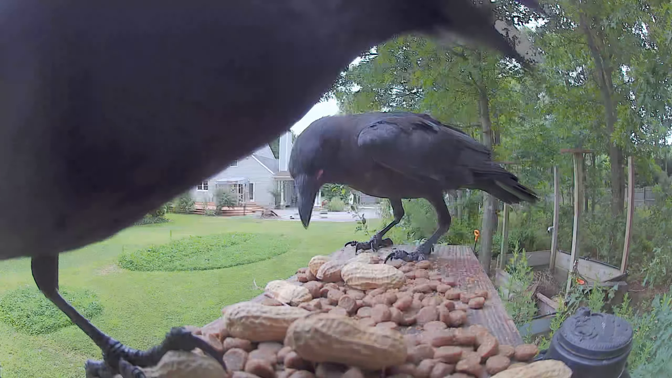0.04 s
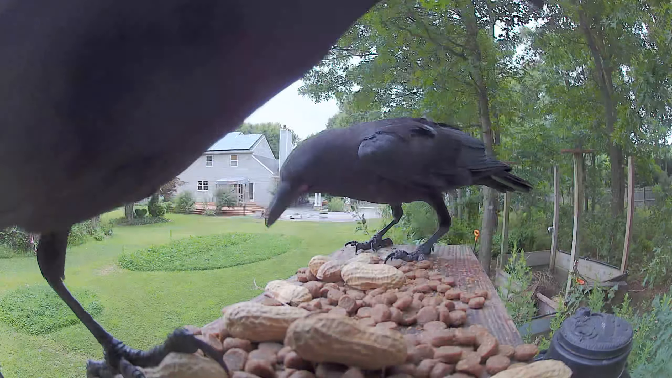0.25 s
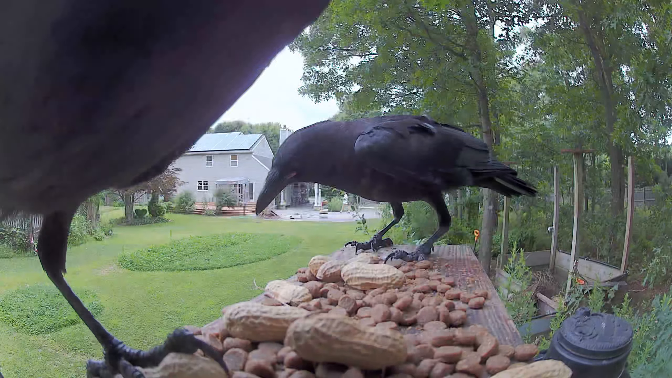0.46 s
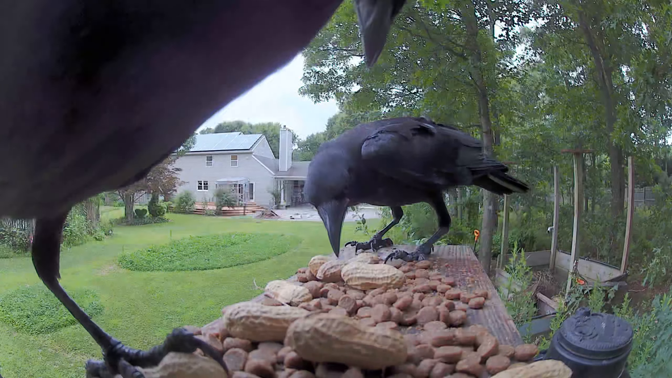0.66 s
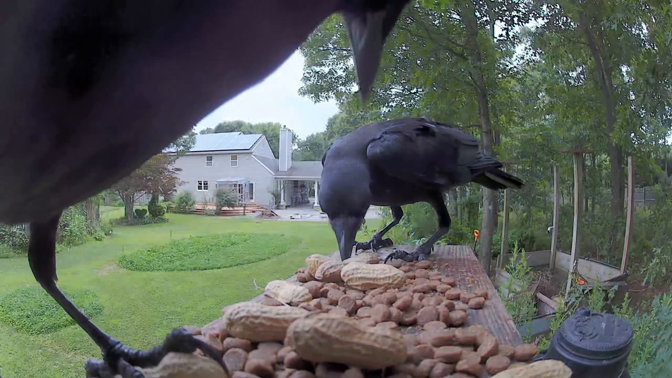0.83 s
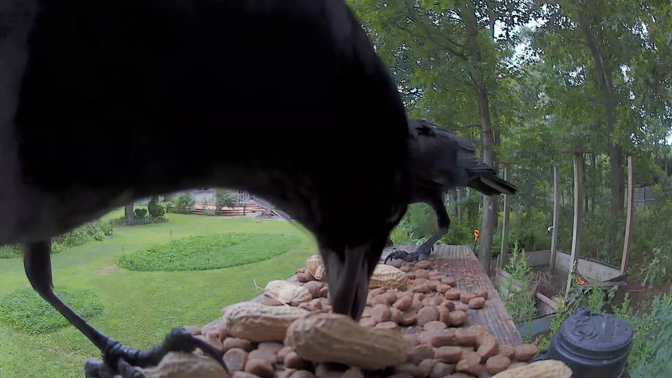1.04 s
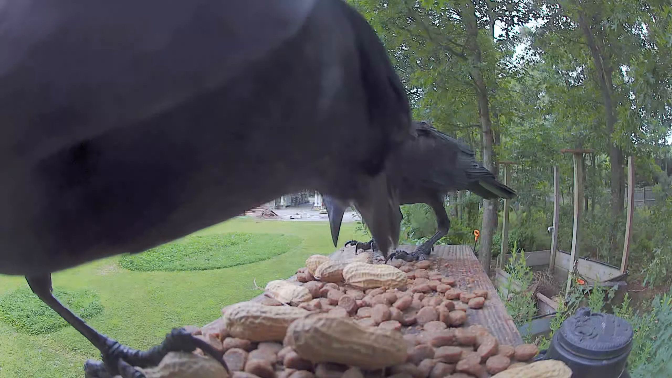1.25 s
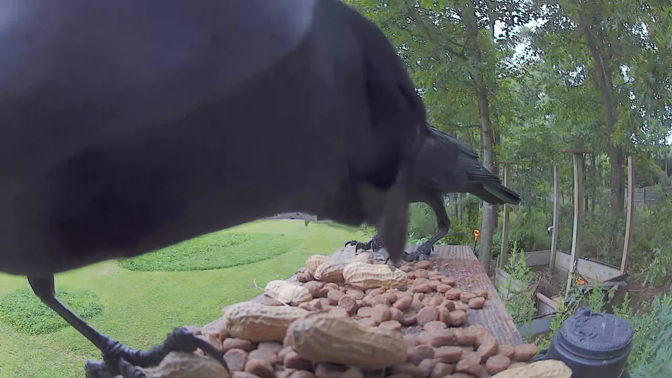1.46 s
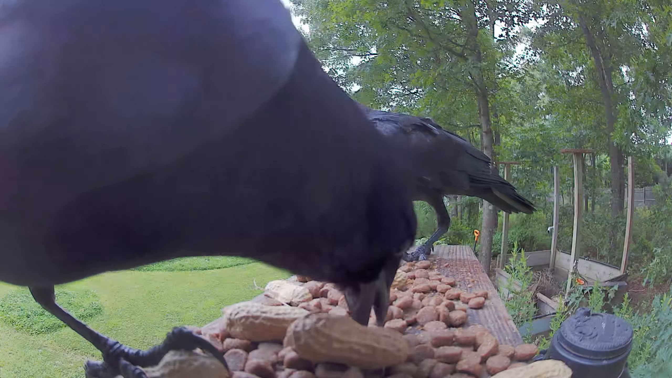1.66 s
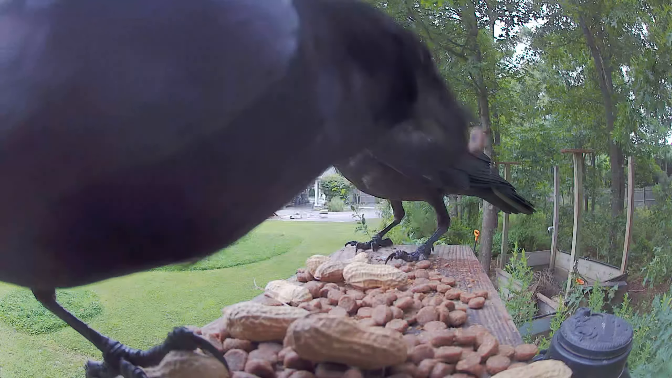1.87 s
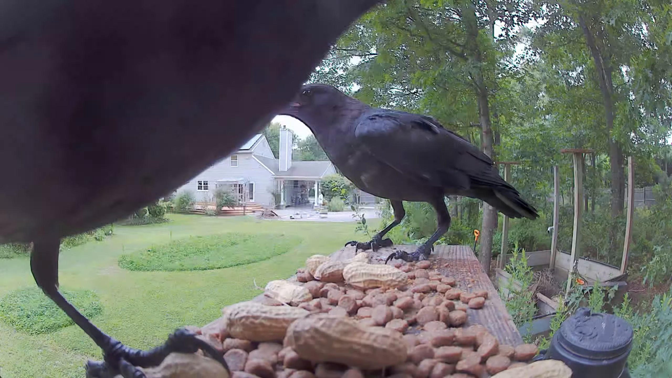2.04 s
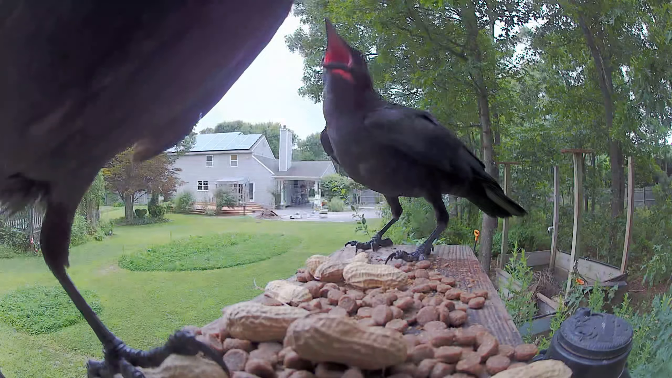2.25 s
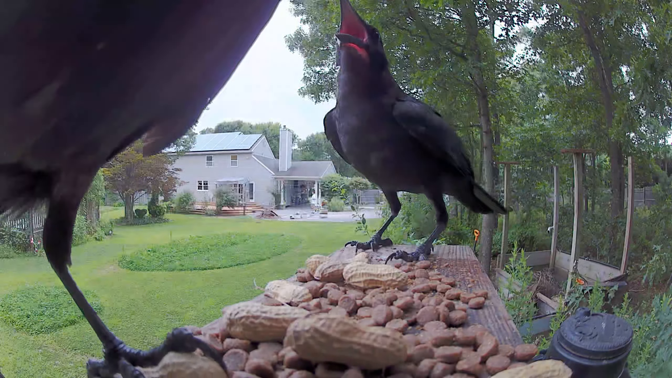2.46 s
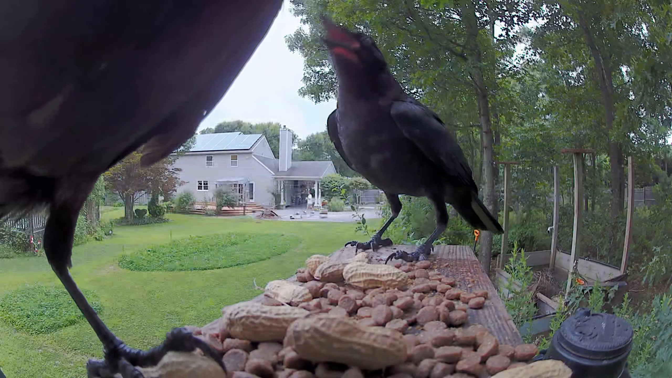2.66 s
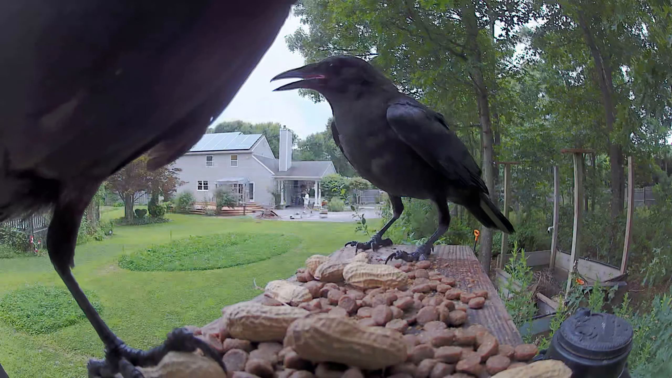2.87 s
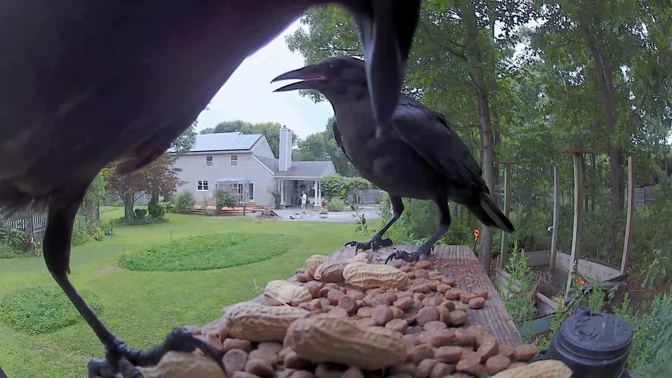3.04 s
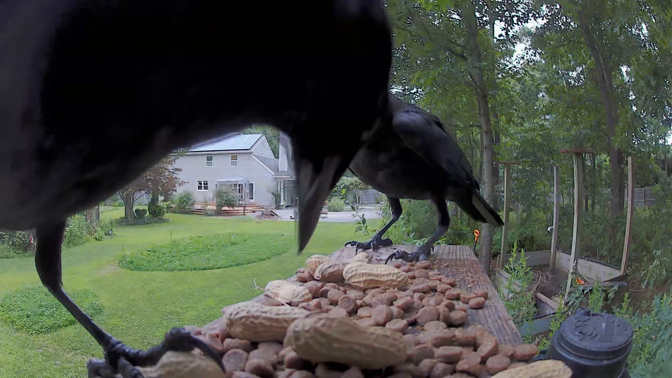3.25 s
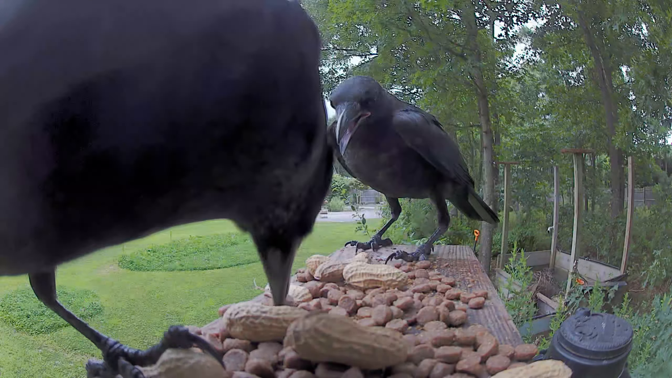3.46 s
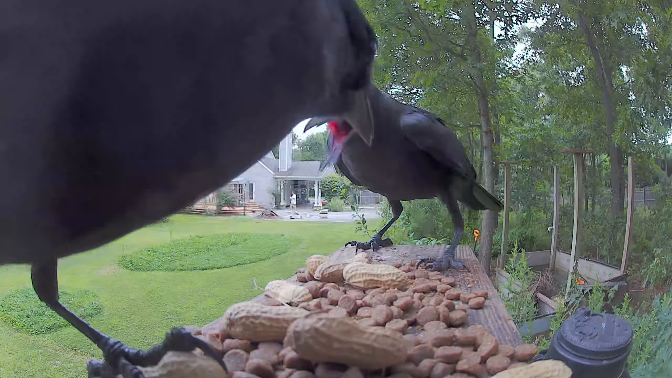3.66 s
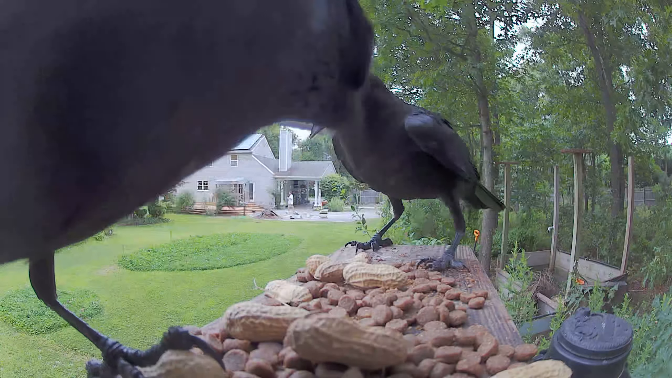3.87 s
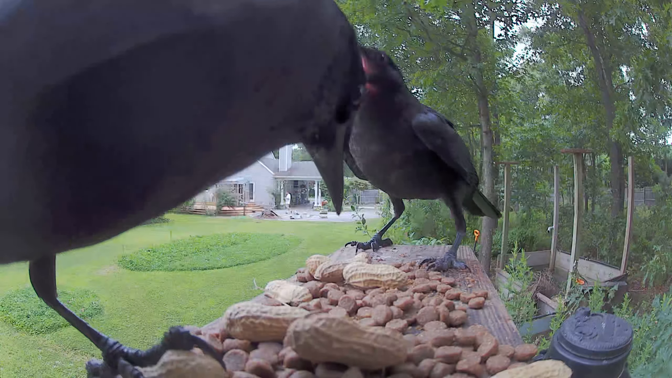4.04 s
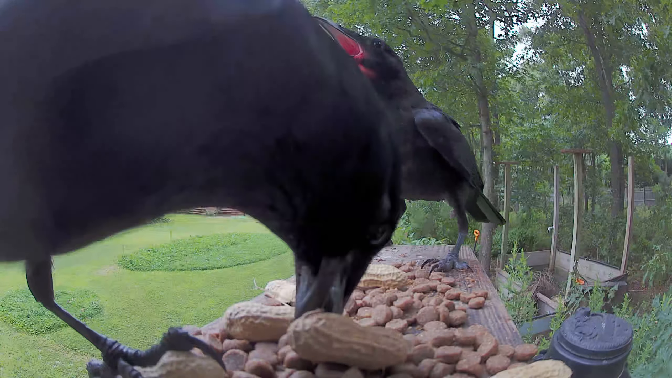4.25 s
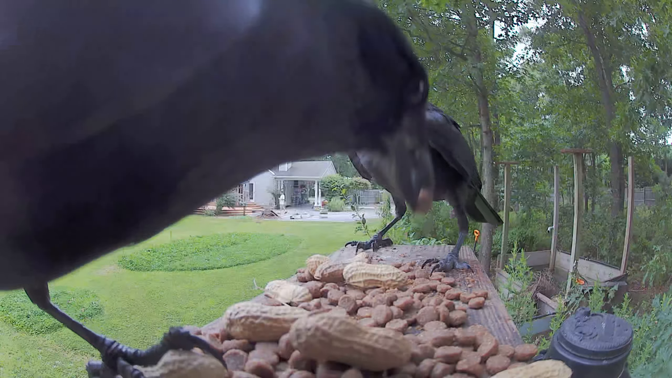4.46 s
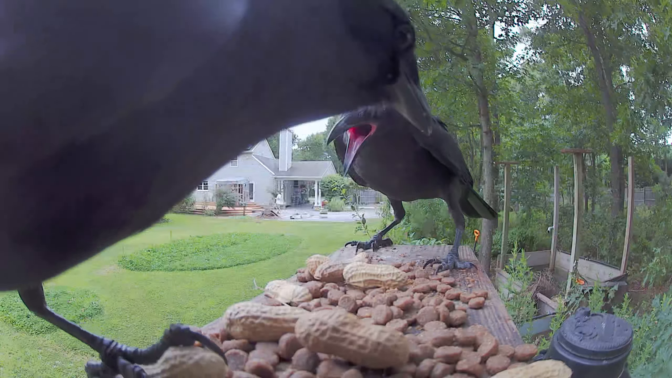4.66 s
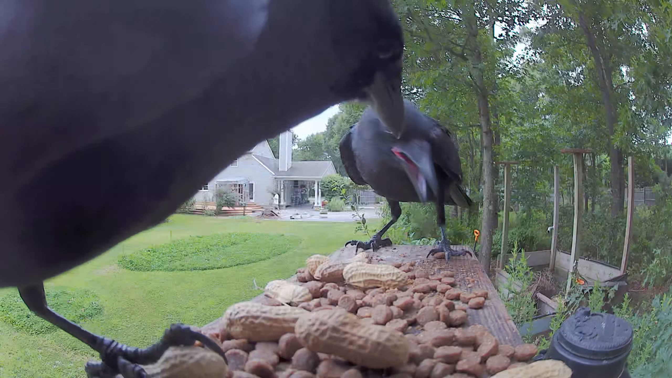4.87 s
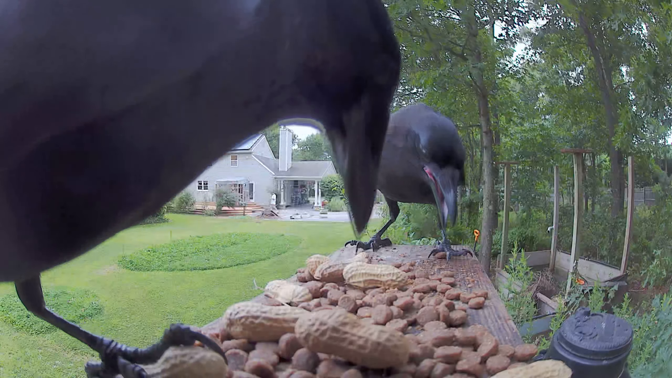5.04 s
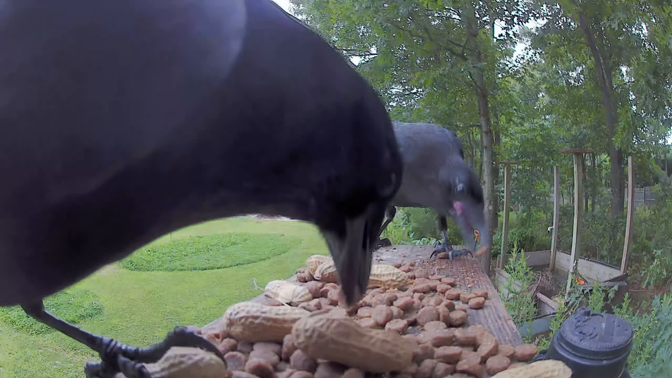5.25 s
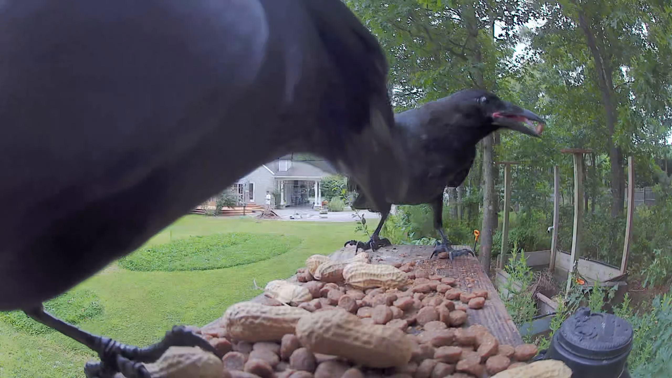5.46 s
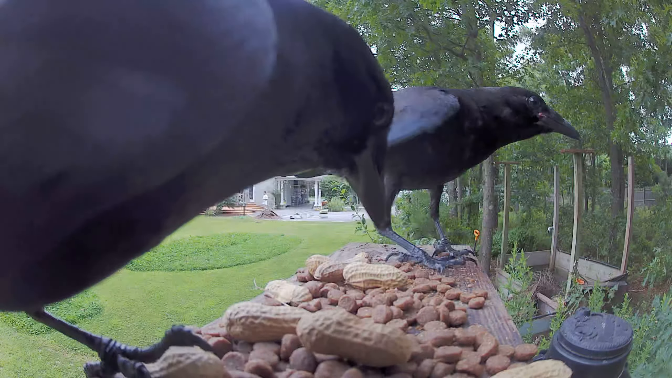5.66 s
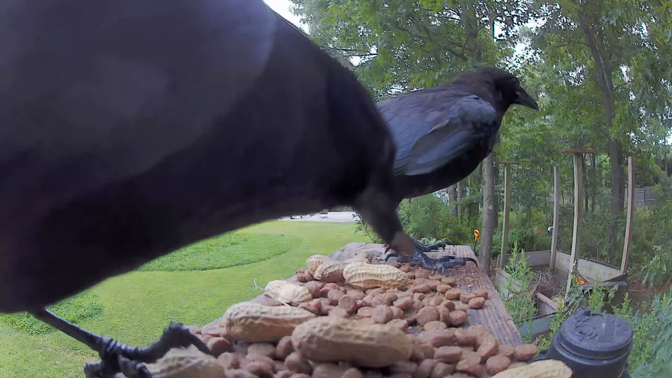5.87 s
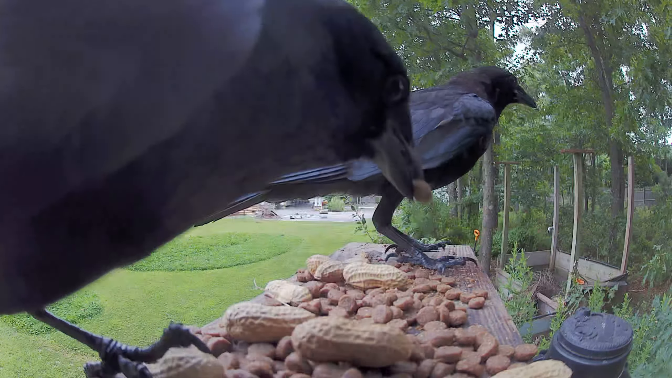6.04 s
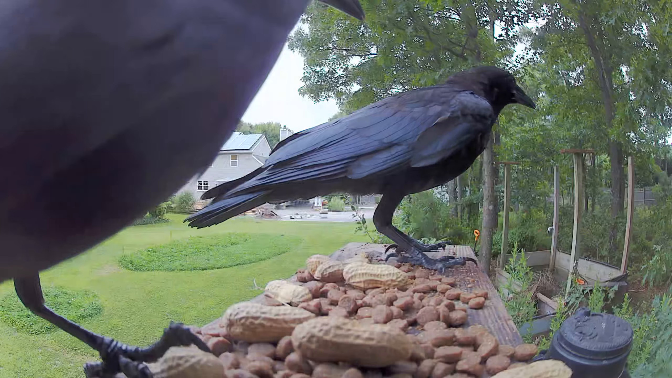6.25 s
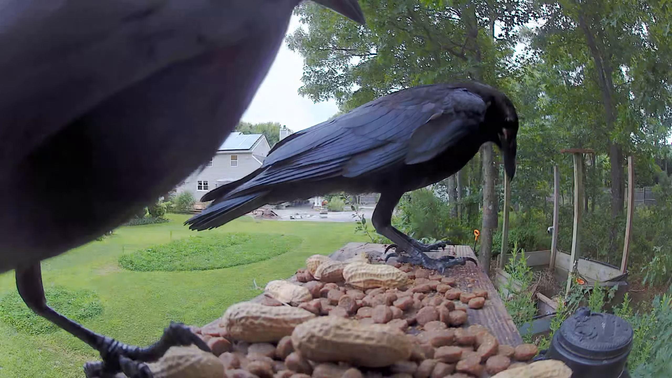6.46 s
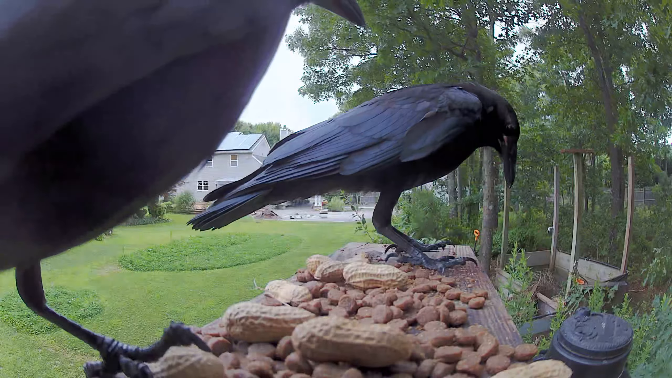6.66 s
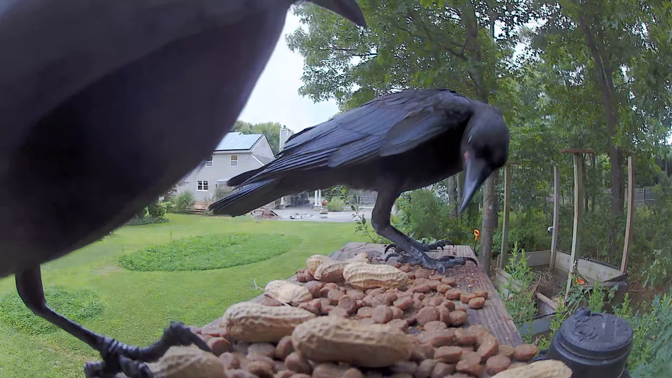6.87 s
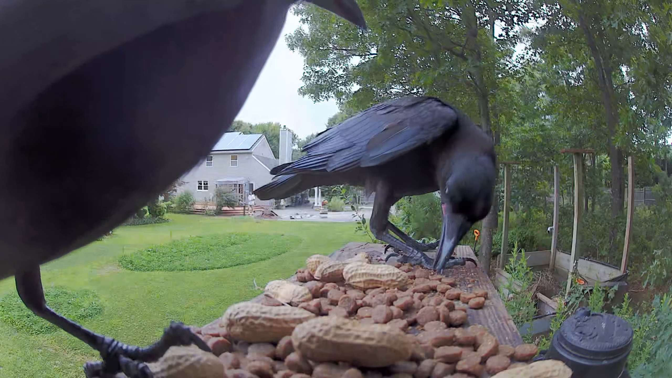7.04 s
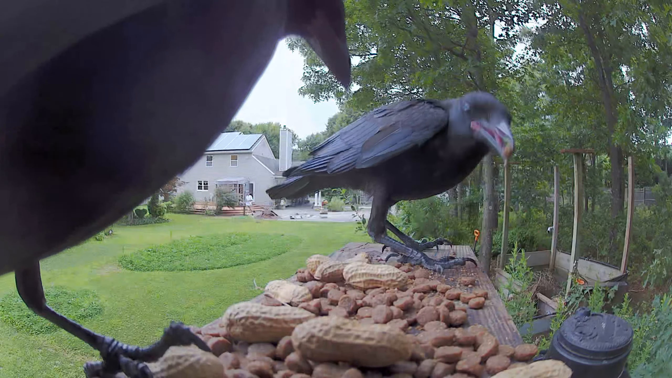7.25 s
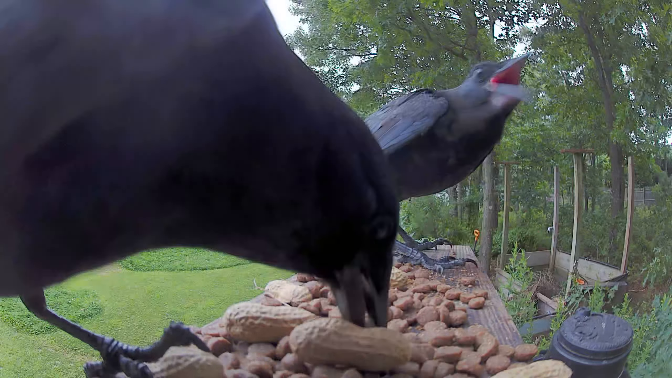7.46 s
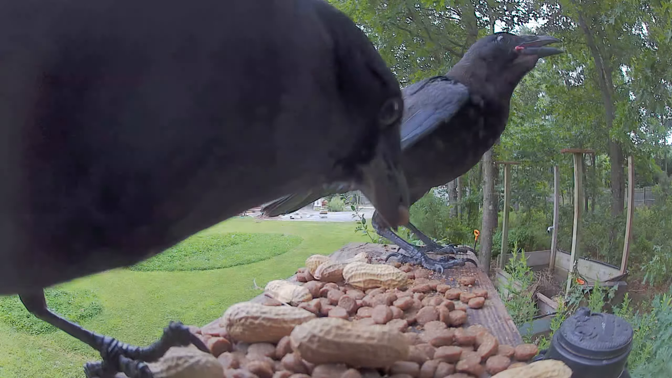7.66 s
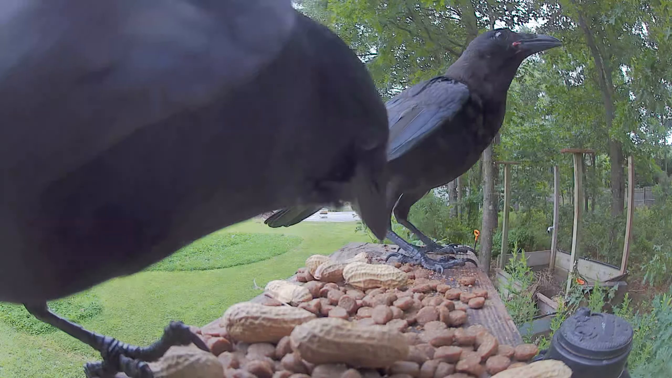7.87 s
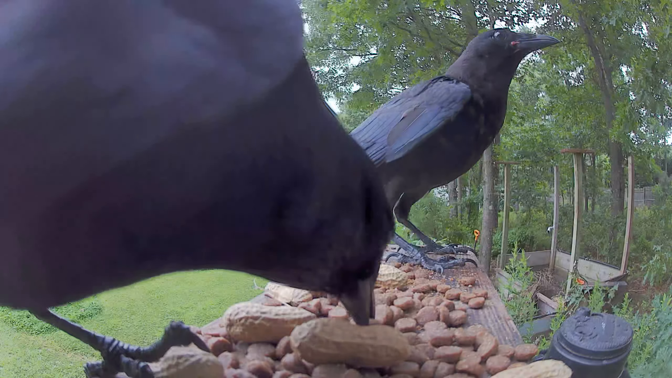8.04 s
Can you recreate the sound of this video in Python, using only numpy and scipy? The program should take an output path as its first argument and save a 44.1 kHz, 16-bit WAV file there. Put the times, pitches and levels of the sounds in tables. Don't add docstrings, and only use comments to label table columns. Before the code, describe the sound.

Two crows feed on a wooden nut tray outdoors: ticks, knocks, shell cracks, two strong hoarse calls, later a quiet sinking moan and short gulping whine.

```python
import sys
import numpy as np
from scipy import signal
from scipy.fft import rfft, irfft
from scipy.io import wavfile
from scipy.ndimage import uniform_filter1d

SR = 44100
rng = np.random.default_rng(int(sys.argv[2]) if len(sys.argv) > 2 else 0)


def amplitude_ratio(level_db):
    exponent = np.asarray(level_db, float) / 20
    return 10 ** exponent


def unload_wav(signal):
    wavfile.write(
        sys.argv[1],
        SR,
        np.round(np.clip(np.atleast_2d(signal).T, -1, 1) * 32767).astype(np.int16),
    )


N = 357651

# frequency in Hz, level in dB.
GARDEN = [(29, -65), (50, -47), (86, -31.5), (100, -10), (124, 0.5), (265, -5), (296, -3), (322, -5.5),
          (456, -6), (566, -6.5), (973, -9.5), (2310, -22), (4070, -26), (6990, -33), (8870, -51),
          (11500, -78), (19500, -120)]
# start in seconds, length in seconds, level in dB.
RUSTLES = [(0.166, 0.035, -79), (1.207, 0.044, -83), (1.285, 0.07, -76), (2.087, 0.022, -69.5),
           (.99, 0.096, -84), (4.398, 0.0633, -82), (4.947, 0.036, -74.5), (5.374, 0.048, -71),
           (5.958, 0.058, -74.5), (7.609, 0.052, -60), (7.718, 0.038, -75), (7.835, .03, -80),
           (1.85, .03, -77)]

# start in seconds, peak in dB.
TRAY_TICKS = [(0.9947, -64), (1.006, -73), (1.013, -63), (1.0182, -53.5), (1.0242, -58), (1.026, -63),
              (1.0605, -57), (1.067, -65), (1.077, -71), (1.0897, -50), (1.0925, -79), (1.172, -64.5),
              (1.279, -62), (1.2905, -46.5), (1.297, -64), (1.3044, -55), (1.3211, -51), (1.3255, -52.5),
              (1.329, -58), (1.338, -63), (1.351, -67), (1.3937, -57), (3.5343, -62), (4.4053, -59),
              (4.4307, -66), (4.9545, -54.5), (5.806, -66), (5.891, -66), (5.97, -71)]
# start in seconds, peak in dB, pitch in Hz.
KNOCKS = [(.174, -65, 2900), (.178, -62, 2800), (0.1916, -58, 1720), (.195, -62, 1980), (0.5583, -58, 1550),
          (0.594, -60, 1550), (1.0196, -55, 980), (1.2183, -63, 1490), (1.2356, -61, 1560),
          (1.2502, -54, 1540), (1.2907, -50, 1400), (1.323, -55, 1650), (1.329, -60, 1600),
          (1.856, -54, 1550), (2.0883, -59, 2400), (2.0903, -58, 1500), (2.2425, -62, 1550),
          (3.5588, -55.5, 1700), (4.4388, -52.5, 1550), (4.441, -57, 1700), (4.445, -59, 1400),
          (4.4493, -58, 1300), (4.685, -62, 1550), (5.352, -57.5, 1600), (5.3595, -55, 1496),
          (5.393, -65, 1600), (5.399, -49, 1490), (5.405, -63, 1500), (5.961, -51, 1450),
          (5.9639, -52, 1550), (5.971, -53, 1900), (5.9784, -46.5, 1400), (5.984, -50, 1490),
          (6.019, -62, 1550), (6.136, -67, 1550)]
# start in seconds, peak in dB, shell pitch in Hz,
# bright snap in dB over the peak, broad click in dB over the peak.
CRACKS = [(0.1642, -45, 3100, -38, -2), (0.3727, -67, 2600, -30, 7), (1.023, -64, 3600, -30, 4),
          (1.055, -64, 2800, -30, 8), (1.0895, -52, 3310, -30, -7), (1.2483, -50, 2400, -9, 13.5),
          (1.2932, -52.5, 2900, -37, 13.5), (1.2935, -55, 4800, -35, -2), (1.166, -69, 3200, -30, 8),
          (1.236, -65, 3600, -25, 8), (1.3215, -65, 3200, -30, 6), (1.3255, -65, 3400, -30, 2),
          (1.394, -58, 3280, -30, 1), (1.852, -55, 2180, -17, 7), (1.8575, -53, 4700, -12, 1),
          (1.857, -53, 3200, -30, -1), (2.0756, -23, 3090, -36.5, -9.5), (2.0964, -55, 2800, -20, 9),
          (2.29, -63, 2770, -30, 10), (2.3346, -61, 5000, -36, 3), (3.487, -46.5, 2850, -18, 3.5),
          (4.9467, -48.5, 3530, -10, -2), (4.947, -61, 4700, -30, -5), (4.9555, -43, 3450, -22, -4),
          (4.988, -54.5, 3620, -30, -4), (5.3764, -56, 1800, -32, 7), (5.388, -39, 3170, -12, 6.5),
          (5.4005, -46, 1900, -19, 16.5), (5.4008, -51, 4600, -15, 10), (5.971, -56, 5900, -10, 2),
          (5.979, -56, 2900, -30, 9), (5.9775, -56.5, 4500, -5, 6), (6.259, -53.5, 2660, -3, 5.5),
          (7.5997, -56, 2980, -23, 13), (7.742, -53.5, 2300, -23.5, 8)]
# start in seconds, peak in dB.
THUDS = [(1.019, -73), (1.29, -72), (3.4093, -74), (4.949, -58.5), (4.96, -57.5), (5.8052, -64.5),
         (5.981, -54), (7.709, -56), (7.835, -62), (7.85, -68)]
TICK_DB, KNOCK_DB, THUD_DB = (-6, -9, -40, 1), (-19.5, -9, -28, 10.5), (-8, 10.5, -10.5, 7)
CRACK_DB = (-46.5, -37)
TRAY_RING_HZ = 1912

# time in seconds,
# pulse rate in Hz, effort in dB, gape of the beak in dB.
CAW = [(2.4115, 411, -37, -15), (2.424, 360.2, -30.5, 1), (2.44, 357.4, -28, 3.5), (2.474, 335.8, -30, 3),
       (2.53, 329.4, -31, 2.5), (2.586, 324.6, -31, 0), (2.61, 329.6, -30.5, 0.5), (2.66, 322.6, -31.5, 0),
       (2.685, 305.8, -33, -1.5), (2.703, 293, -36.5, -0.77), (2.71, 272.3, -38, -1),
           (2.715, 250, -36.5, 0.2), (2.72, 234.8, -38, 0), (2.731, 207.7, -44.5, -1)]
# seconds, pulse rate in Hz, effort in dB, gape in dB.
DOUBLE_FIRST = [(3.776, 295.1, -34, 0), (3.797, 312.7, -29.5, 0), (3.814, 314.5, -28.5, -7),
                (3.843, 307.4, -27.5, -9), (3.866, 310, -27.5, -6), (3.89, 304.7, -27.5, -8),
                (3.93, 291.1, -26.5, -6), (3.96, 294.7, -31, -5)]
BREAK = [(3.97, 287.9, -30, -4.5), (3.98, 281.4, -32, -7), (3.986, 280.2, -29.5, -6.5),
         (3.991, 302, -27.5, -7)]
DOUBLE_SECOND = [(4.0, 297.9, -28.5, -3.5), (4.034, 321.7, -26, -7.5), (4.079, 338.1, -25, -5),
                 (4.12, 322.3, -25.5, -9), (4.138, 308, -30.5, -1), (4.163, 209.2, -39.5, -3.5)]
# seconds, pulse rate in Hz, effort in dB, gape in dB.
MOAN = [(7.13, 315.4, -54, -6), (7.148, 306.4, -42, -11.5), (7.182, 320.2, -42.5, -5.5),
        (7.211, 301.1, -42, -7.5), (7.284, 261.9, -44.5, -10.5), (7.402, 244, -46.5, -9),
        (7.46, 236.6, -45, -11), (7.49, 218.4, -50.5, -4.5), (7.515, 210.7, -54, -9.5),
        (7.535, 228.2, -63, -11), (7.55, 250, -63, -21), (7.57, 260, -68, -25)]
# seconds, pulse rate in Hz, effort in dB, gape in dB.
GULP = [(7.617, 360.8, -80.5, 16), (7.63, 361, -52, -7), (7.649, 277.2, -46, -23),
        (7.653, 335.2, -33, -8.5), (7.66, 342.5, -33, -4.5), (7.667, 337.3, -38.5, -11.5),
        (7.684, 292, -35, -13), (7.689, 310, -31, -11.5), (7.704, 308, -38, -14.5)]
WHINE = [(7.717, 338.6, -37.5, -20), (7.75, 351.6, -42, -34), (7.776, 362.6, -44, -36),
         (7.796, 424.6, -43.5, -41), (7.818, 356, -39, -24), (7.83, 364, -54.5, -11)]

SETTLED = [
    (0, .03, .66),
    (.015, .08, .3),
    (.07, .2, .1),
    (.03, .5, .66),
]
# start in seconds, length in seconds, slip 0-1, rasp 0-1.
FITS = [(2.41, .03, .01, .08), (2.444, .028, .03, .5), (2.472, .018, .02, .2), (2.685, .025, .07, .35),
        (3.78, .024, .08, .55), (3.915, .025, .05, .4), (3.94, .024, .13, .4), (3.99, .007, .15, .6),
        (3.997, .035, .06, .4), (4.126, .017, .06, .45), (7.165, .05, .04, .15), (7.135, .015, .1, .4),
        (7.235, .025, .15, .4), (7.265, .05, .18, .4), (7.6, .028, .06, .9), (7.63, .02, .03, .9),
        (7.65, .016, .16, .92), (7.666, .05, .08, .95)]
# start in seconds, length in seconds, slip 0-1, rasp 0-1.
CREAKS = [
    (2.705, .06, .2, .16),
    (3.964, .026, .06, .3),
    (4.143, .06, .2, .2),
    (7.485, .11, .3, .6),
    (7.674, .006, .08, .95),
]
# time in seconds, length in seconds, change in dB.
JOLTS = [(2.445, .002, -4), (2.454, 0.0021, -5.5), (2.463, 0.0035, -6), (2.472, 0.0031, -4.5),
         (3.97, 0.0061, 2), (3.99, .003, 0.5)]
# time in seconds, peak in dB.
CATCHES = [(2.4458, -21.5), (2.4502, -24), (2.456, -17), (2.4575, -21.5), (2.4615, -24.5), (2.4641, -18.5)]

# frequency in Hz, level in dB.
RISING_THROAT = [(120, -43.5), (360, -23), (660, -4.5), (1150, -20), (1490, -2.5), (2300, -22), (3160, -25)]
RISING_BEAK = [(3500, -18), (4150, -13.5), (4700, 0), (5050, -1), (5400, -6), (5800, -21.5), (6860, -14.5),
               (7850, -25)]
UP_THROAT = [(320, -24), (600, -4.5), (1020, -13.5), (1350, -3.5), (1650, -12), (1970, -7), (2340, -12),
             (2980, -25)]
UP_BEAK = [(3500, -18.5), (4150, -12), (4710, -2.5), (5240, -7), (5600, -26.5), (5900, -16.5), (6860, -10),
           (7850, -25)]
CLOSING_BEAK = [(2950, -22), (3500, -21), (4200, -17), (4800, -0.5), (5250, -13.5), (5650, -26.5),
                (6700, -8), (7850, -30.5)]
# frequency in Hz, level in dB.
CREAK_THROAT = [(120, -50.5), (290, -12), (600, -12), (1000, -4), (1350, 2.5), (1900, -10.5), (2400, -15),
                (2950, -39)]
SLACK_BEAK = [(3390, -30), (4090, -24), (5000, -9), (5600, -15), (6150, -26), (6600, -33), (7850, -40)]
# frequency in Hz, level in dB.
LEVEL_THROAT = [(120, -53), (290, -31.5), (560, -3.5), (990, -6.5), (2090, 1.5), (2530, -6), (2830, -11),
                (2990, -32.5)]
LEVEL_BEAK = [(3100, -33.5), (3650, -38.5), (4400, -29), (5480, -7), (5800, -15), (6120, -11),
              (6840, -16.5), (7400, -26), (7600, -54)]
RAGGED_EDGE = [(7400, -23), (7850, -39)]
BOWED_THROAT = [(120, -53), (290, -25.5), (590, -6.5), (1000, -3.5), (2050, 3.5), (2380, 0.5), (2650, -20),
                (2990, -41.5)]
BREAK_THROAT = [(120, -42.5), (290, -14.5), (600, -13), (1150, -4.5), (1450, 2), (1900, -14.5),
                (2350, -6.5), (2800, -35.5)]
TURNED_THROAT = [(120, -54), (310, -29.5), (580, -7), (1050, -10), (2020, 0), (2380, -5.5), (2960, -44)]
TURNED_BEAK = [(3000, -47.5), (3390, -29.5), (4090, -28), (5090, -8.5), (5830, -13), (6150, -24.5),
               (6490, -27), (7850, -34)]
# frequency in Hz, level in dB.
AWAY_THROAT = [(120, -44), (230, -43), (550, -21.5), (1220, -9), (1550, 6.5), (2100, -11), (2850, -30),
               (3200, -62)]
AWAY_BEAK = [(3400, -45.5), (3750, -20), (4050, -8.5), (4610, -24), (5350, -13), (5840, -22.5), (6580, -21),
             (7400, -27.5), (7850, -43.5)]
WOBBLING_THROAT = [(120, -56), (550, -28), (1150, -11), (1450, 7.5), (1650, -1), (2100, -12.5), (2800, -29),
                   (3300, -50)]
GLIDING_BEAK = [(3520, -42), (3880, -28), (4160, -9), (4650, -25), (5350, -12.5), (5840, -23),
                (7200, -24.5), (7850, -39)]
SINKING_THROAT = [(120, -61), (230, -31), (550, -27.5), (1150, -10.5), (1450, 6), (2000, -15.5),
                  (2560, -32), (3400, -53.5)]
SINKING_BEAK = [(3650, -46), (4000, -27), (4270, -12), (4700, -23.5), (5350, -13.5), (5840, -26),
                (7200, -21), (7850, -37.5)]
# frequency in Hz, level in dB.
SHUT_THROAT = [(120, -53), (340, -11), (510, 0), (610, 4), (790, 5), (1490, -2.5), (1660, -27), (1890, -16)]
SHUT_BEAK = [(1990, -27.5), (2730, -45), (3500, -48), (4300, -53), (5200, -53), (7850, -64)]
GAPING_THROAT = [(120, -46), (300, -5.5), (650, -5.5), (1000, 2.5), (1350, -4), (2000, -6), (2780, -25)]
GAPING_BEAK = [(3400, -30), (4200, -26), (4700, -15.5), (5150, -35), (5400, -26), (6140, -39.5),
               (7850, -46)]
SWALLOW_THROAT = [(120, -36), (300, -5.5), (620, -2), (950, 2.5), (1250, 1.5), (1850, -3.5), (2500, -35)]
SWALLOW_BEAK = [(3000, -27), (3600, -21), (4200, -12), (4800, -17), (5700, -36), (6200, -53), (7850, -38.5)]
LIFTING_THROAT = [(120, -54), (340, -3), (510, -23), (720, -6.5), (1120, 0.5), (1490, -11.5), (1890, -12)]
LIFTING_BEAK = [(2200, -29.5), (2500, -46), (3900, -50), (4350, -43), (4700, -50), (5200, -61), (7850, -70)]
# start in seconds, resonances as rows of Hz and dB.
POSTURES = [(2.3, RISING_THROAT + RISING_BEAK), (2.459, UP_THROAT + UP_BEAK),
            (2.68, UP_THROAT + CLOSING_BEAK), (2.696, CREAK_THROAT + CLOSING_BEAK),
            (3.599, LEVEL_THROAT + LEVEL_BEAK[:-2] + RAGGED_EDGE), (3.825, LEVEL_THROAT + LEVEL_BEAK),
            (3.9, BOWED_THROAT + LEVEL_BEAK), (3.94, BOWED_THROAT + LEVEL_BEAK[:-2] + RAGGED_EDGE),
            (3.958, BREAK_THROAT + LEVEL_BEAK[:-2] + RAGGED_EDGE),
            (3.991, TURNED_THROAT + LEVEL_BEAK[:-2] + RAGGED_EDGE), (4.012, TURNED_THROAT + TURNED_BEAK),
            (4.141, CREAK_THROAT + SLACK_BEAK), (7.0, AWAY_THROAT + AWAY_BEAK),
            (7.249, WOBBLING_THROAT + GLIDING_BEAK), (7.315, SINKING_THROAT + GLIDING_BEAK),
            (7.36, SINKING_THROAT + SINKING_BEAK), (7.6, SHUT_THROAT + SHUT_BEAK),
            (7.648, GAPING_THROAT + GAPING_BEAK), (7.667, GAPING_THROAT + SWALLOW_BEAK),
            (7.685, SWALLOW_THROAT + SWALLOW_BEAK), (7.713, SHUT_THROAT + SHUT_BEAK),
            (7.795, LIFTING_THROAT + LIFTING_BEAK)]

ATTACK_S, RELEASE_S = .012, .021


def smooth(x, s):
    size = max(int(s * SR), 1)
    return uniform_filter1d(uniform_filter1d(x, size), size)


def drift(s):
    slow = smooth(rng.standard_normal(N), s)
    return slow / slow.std()


def evened(x, s):
    return x / np.sqrt(smooth(x ** 2, s) + 1e-12)


def coloured(x, points):
    hz, level_db = np.transpose(points)
    grid = np.maximum(np.fft.rfftfreq(4096, 1 / SR), 1)
    outline = amplitude_ratio(np.interp(np.log(grid), np.log(hz), level_db))
    cepstrum = irfft(np.log(outline))
    cepstrum[1:2048] *= 2
    cepstrum[2049:] = 0
    response = irfft(np.exp(rfft(cepstrum)))
    return signal.fftconvolve(x, response)[:len(x)]


def cut(x, hz, kind, order=6):
    return signal.sosfilt(signal.butter(order, hz, kind, fs=SR, output="sos"), x)


def ring(hz, t60, size=4000):
    t = np.arange(size) / SR
    return np.sin(2 * np.pi * hz * t) * amplitude_ratio(-60 * t / t60)


def garden():
    noise = coloured(rng.standard_normal(N), GARDEN)
    whine_hz = 4210 + 170 * drift(.006) + 130 * drift(.03)
    whine = np.sin(2 * np.pi * np.cumsum(whine_hz) / SR) * amplitude_ratio(-85.5 + 2.6 * drift(.004))
    return amplitude_ratio(-68 + 1.0 * drift(0.025)) * noise / noise.std() + whine


def echoes(x):
    scatter_db, scatter_t60_s = -34, .15
    wall_s, wall_smear_s, wall_db = 0.052, .022, -35
    t = np.arange(int(.25 * SR)) / SR
    noise = rng.standard_normal((2, len(t)))
    dull = .8 * noise[1] + .6 * cut(noise[1], 3200, "low", order=2)
    wall = dull * np.exp(-((t - wall_s) / wall_smear_s) ** 2)
    scatter = amplitude_ratio(scatter_db - 60 * t / scatter_t60_s) * (t > .004) * noise[0]
    returns = scatter + amplitude_ratio(wall_db) * wall
    return signal.fftconvolve(x, returns / np.sqrt(.01 * SR))[:N]


def rustle():
    grains_per_s = 2600
    t = np.arange(N) / SR
    struck = rng.random(N) < grains_per_s / SR
    grains = struck * rng.uniform(-1.7, 1.7, N) * amplitude_ratio(3 * drift(.003))
    grains = cut(grains + 0.027 * rng.standard_normal(N), [1400, 4400], "band", order=3)
    swell = sum(amplitude_ratio(db) * ((t > s) & (t < s + length)) for s, length, db in RUSTLES)
    return smooth(swell, .008) * grains / grains.std()


def blows():
    cracks = [(s, db, hz, *CRACK_DB, *rest) for s, db, hz, *rest in CRACKS]
    ticks = [(s, db, TRAY_RING_HZ, *TICK_DB) for s, db in TRAY_TICKS]
    knocks = [(*row, *KNOCK_DB) for row in KNOCKS]
    thuds = [(s, db, 1550, *THUD_DB) for s, db in THUDS]
    return cracks + ticks + knocks + thuds


def pecks():
    tail_db, click_db_over_grit, grit_db = -25.5, 13, -9.5
    t = np.arange(4000) / SR
    out, snaps = np.zeros((2, N + 4000))
    rows = blows()
    noise = rng.standard_normal((len(rows), 4000))
    grains = amplitude_ratio(11.0 * rng.standard_normal((len(rows), 40))).repeat(100, axis=1)
    contact = 1 - np.exp(-t / 0.00044)
    low, high = ring(TRAY_RING_HZ, 0.066), amplitude_ratio(-5) * ring(1.5 * TRAY_RING_HZ, 0.032)
    thump = (1 - np.exp(-t / 0.00074)) * ring(260, 0.081)
    for (s, peak_db, hz, ring_db, thump_db, snap_db, click_db), hiss, jolts in zip(rows, noise, grains):
        hit = slice(int(s * SR), int(s * SR) + 4000)
        rattle = amplitude_ratio(tail_db) * jolts * np.exp(-t / 0.02)
        burst = contact * (np.exp(-t / 0.0026) + rattle) * hiss * amplitude_ratio(grit_db)
        snaps[hit] += amplitude_ratio(peak_db + snap_db + 19.0) * burst * np.exp(-t / .004)
        burst[2] += amplitude_ratio(click_db_over_grit)
        out[hit] += amplitude_ratio(peak_db + click_db) * cut(burst, [hz / 1.75, hz * 1.27], "band", order=3)
        shell = ring(hz, 36 / hz) + amplitude_ratio(2.5) * ring(hz / 1.95, 13 / hz)
        out[hit] += amplitude_ratio(peak_db - 7.5) * contact * shell
        tray = contact * (low + min(jolts[-1], 1) * high) * smooth(jolts, .001) ** 0.34
        out[hit] += amplitude_ratio(peak_db + ring_db) * tray
        out[hit] += amplitude_ratio(peak_db + thump_db - 6.0) * thump
    return (out + cut(snaps, [5600, 7600], "band", order=3))[:N]


def catches():
    t, out = np.arange(N) / SR, np.zeros(N)
    for s, db in CATCHES:
        out += amplitude_ratio(db) * np.exp(-((t - s) / .0007) ** 2) * np.sin(2 * np.pi * 4839 * (t - s))
    return out


def harshness(t, calls):
    starts = [call[0][0] - ATTACK_S for call in calls]
    slip, rasp, half = np.transpose(SETTLED)[:, np.searchsorted(starts[1:], t)]
    onsets = [(start, .024, .08, .4) for start in starts]
    for s, length, fit_slip, fit_rasp in [*onsets, *FITS, *CREAKS]:
        now = (t >= s) & (t < s + length)
        slip[now], rasp[now] = fit_slip, fit_rasp
    for s, length, *_ in CREAKS:
        half[(t >= s) & (t < s + length)] = 0
    return [np.abs(smooth(c, .008)) for c in (slip, rasp, half)]


def syrinx(rate_hz, slip, half, rasp):
    halves = 2 * np.cumsum(rate_hz * (1 + 0.0028 * drift(0.022))) / SR
    which = np.round(halves).astype(int)
    chance = rng.standard_normal((which[-1] + 1, 3))[which]
    since = (halves - which) / (2 * rate_hz)
    since = since - (.0004 * slip ** 1.5 + 2e-6) * chance[:, 0] - 7.5e-5 * (which % 2)
    size = -np.where(which % 2, half, 1) * amplitude_ratio(8 * slip * chance[:, 1])
    pulses = size * np.sinc(18000 * since) * np.exp(-(since / .0003) ** 2)
    jets = amplitude_ratio(2.8 * chance[:, 2]) * np.exp(-(since / 0.0025) ** 2)
    puffs = size * jets * rng.standard_normal(N)
    throat_air = .55 * slip * np.clip(half / 0.063, 0, 1) * puffs
    return pulses + throat_air, pulses * (1 - rasp) + 0.2 * rasp * puffs


def melody(t, calls):
    rows = []
    for call in calls:
        for (s, rate, effort, gape), shift in ((call[0], -ATTACK_S), (call[-1], RELEASE_S)):
            rows.append((s + shift, rate, effort - 52, gape))
        rows[-1:-1] = call
    s, *columns = np.transpose(rows)
    rate_hz, throat_db, beak_db = [smooth(np.interp(t, s, c), .003) for c in columns]
    jolts_db = sum(db * np.exp(-((t - at) / length) ** 2) for at, length, db in JOLTS)
    return rate_hz, throat_db, beak_db + jolts_db


def vocal_tract(t, clear, raspy, throat_db, beak_db):
    out = np.zeros(N)
    ends = [start for start, _ in POSTURES[1:]] + [9]
    for (start, tract), end in zip(POSTURES, ends):
        a, b = int((start - .05) * SR), min(int((end + .05) * SR), N)
        throat = evened(cut(coloured(clear[a:b], tract), 2500, "low"), 0.017)
        beak = evened(cut(coloured(raspy[a:b], tract), 2900, "high"), 0.0076)
        turn = smooth(1. * ((t[a:b] >= start) & (t[a:b] < end)), .013)
        out[a:b] += turn * amplitude_ratio(throat_db[a:b]) * (throat - amplitude_ratio(beak_db[a:b]) * beak)
    return out


def bird():
    t = np.arange(N) / SR
    calls = [CAW, DOUBLE_FIRST + BREAK + DOUBLE_SECOND, MOAN, GULP + WHINE]
    rate_hz, throat_db, beak_db = melody(t, calls)
    slip, rasp, half = harshness(t, calls)
    wavering = np.minimum(half * amplitude_ratio(3.0 * drift(0.056)), .9)
    clear, raspy = syrinx(rate_hz, slip, wavering, rasp)
    out = vocal_tract(t, clear, raspy, throat_db, beak_db)
    out += amplitude_ratio(throat_db - 42) * cut(rng.standard_normal(N), [2400, 7000], "band", order=2)
    voiced = sum((t >= c[0][0] - .03) & (t <= c[-1][0] + RELEASE_S) for c in calls)
    out *= smooth(1. * voiced.clip(0, 1), .002)
    slack = np.clip(1 - half / .08, 0, 1)
    spread = np.r_[1, np.zeros(22), .5]
    smeared = signal.lfilter(spread[::-1], spread, (1 - slack) * out)
    return slack * np.roll(out, len(spread) // 2) + smeared


def scene():
    near = bird() + catches() + pecks() + rustle()
    return np.tile(near + echoes(near) + garden(), (2, 1))


def roll_off(x):
    return signal.sosfilt(signal.butter(12, 9020, fs=SR, output="sos"), x)


def record(dry):
    sampling_hz, image_db, hiss_db = 16000, -25, -103
    heard = cut(cut(dry, 7680, "low", order=14), 59.91, "high", order=2)
    mirror = 2 * dry * np.cos(2 * np.pi * sampling_hz * np.arange(N) / SR)
    heard = heard + amplitude_ratio(image_db) * cut(mirror, [8250, 8950], "band", order=6)
    return roll_off(heard + amplitude_ratio(hiss_db) * rng.standard_normal(N))


dry = scene()
out = record(dry)
unload_wav(out)
```